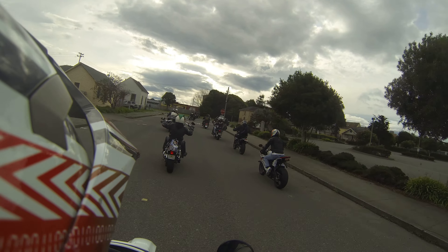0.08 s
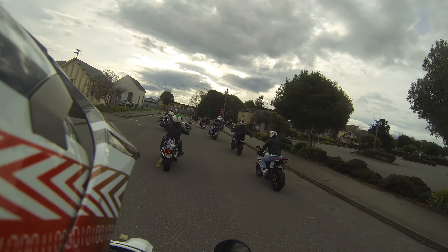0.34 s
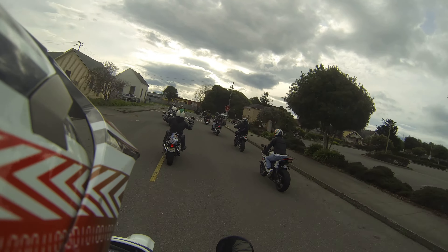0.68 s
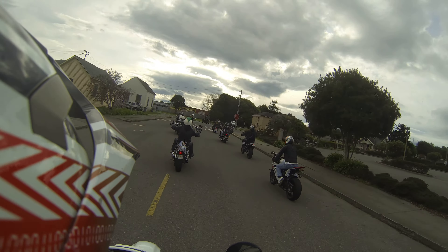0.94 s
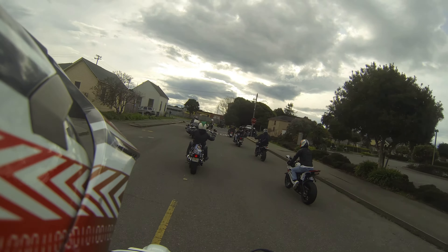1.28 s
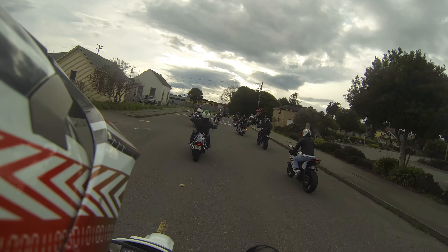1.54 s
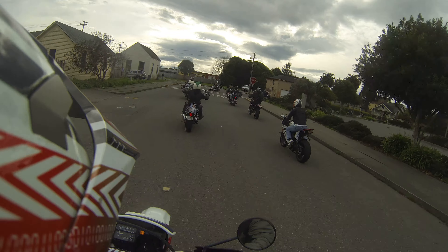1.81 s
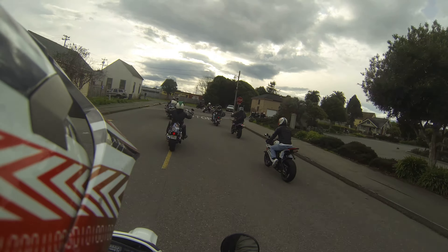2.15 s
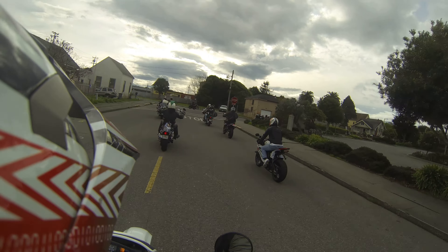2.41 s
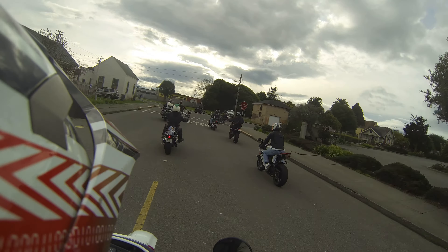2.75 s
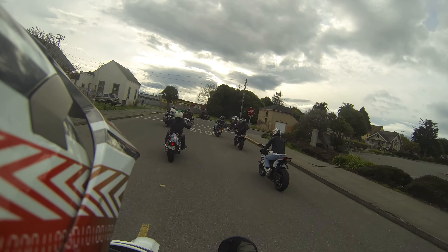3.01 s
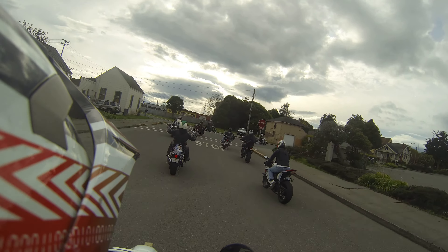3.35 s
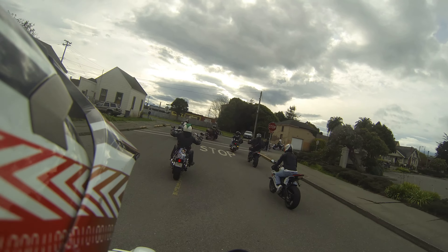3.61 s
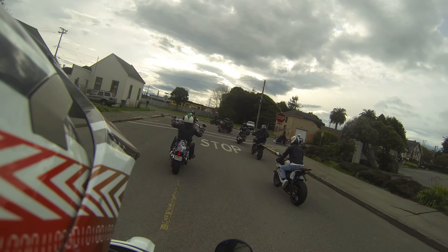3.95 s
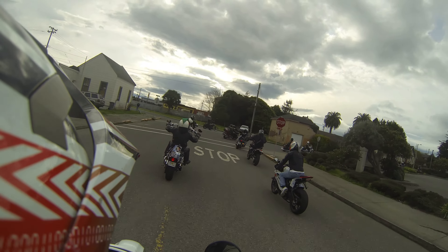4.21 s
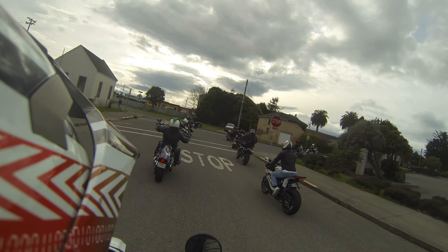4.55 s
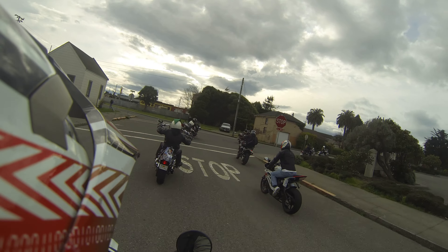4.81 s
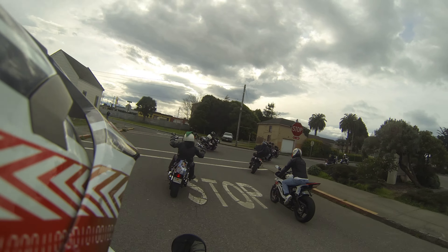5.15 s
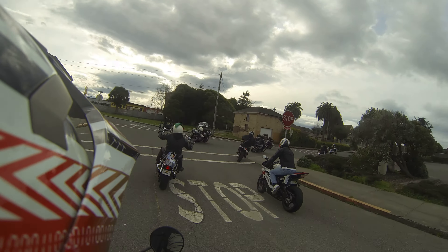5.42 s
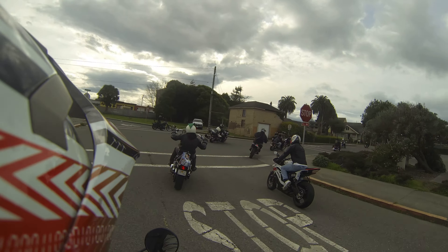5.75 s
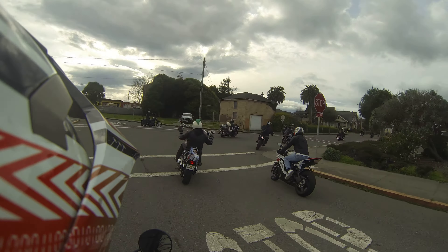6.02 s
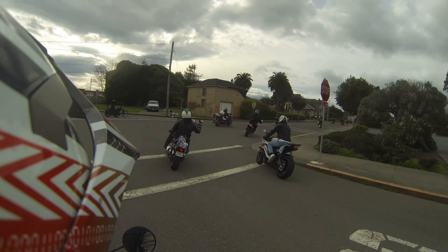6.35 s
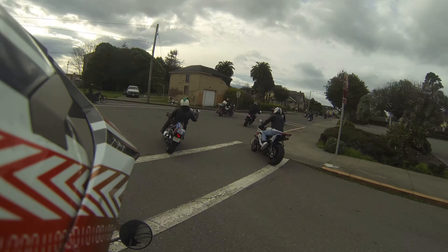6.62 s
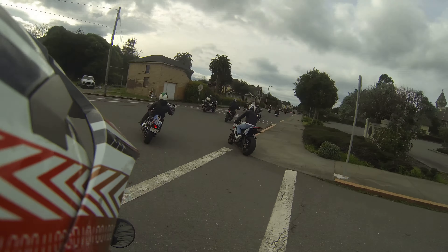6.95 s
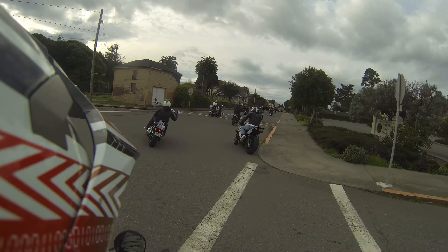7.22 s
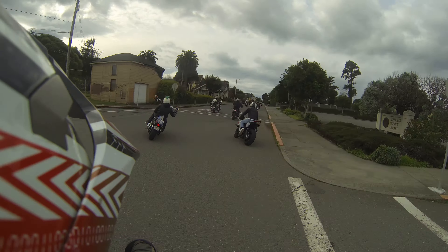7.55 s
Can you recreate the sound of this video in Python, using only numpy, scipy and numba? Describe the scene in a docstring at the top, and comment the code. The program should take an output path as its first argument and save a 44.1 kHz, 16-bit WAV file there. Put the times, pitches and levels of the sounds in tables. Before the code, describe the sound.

Heard from a rider's helmet in a group ride along a street, a single-cylinder motorcycle thumps, booms and rattles. A twin-cylinder bike just ahead barks with sharp, uneven cracks, another growls close by, and more drone further off, one giving a few brief revs. Low tyre and air rush and a faint chain hiss run underneath. Near the end the engines climb in pitch as the group pulls away through a junction.

```python
"""A single-cylinder motorcycle booms, thumps and clatters, heard from its rider's helmet in a group ride.
Its crank shakes the bike, each firing rings the exhaust pipe, and the piston and valves rattle the metal.
A V-twin just ahead barks and cracks in uneven pairs, a four-cylinder growls close by, the pack drones
further off and a sports bike revs briefly. Tyres and air rush and a chain hisses as the group rolls
along a street, then pulls away through a junction."""
import sys
import numpy as np
from scipy import signal
from scipy.fft import rfft, irfft
from scipy.io import wavfile
from numba import njit

SR = 44100
rng = np.random.default_rng(int(sys.argv[2]) if len(sys.argv) > 2 else 0)


def put_to_file(sound):
    """Save the sound as 16-bit audio at rate SR, in the file named by the first command-line argument."""
    columns = np.atleast_2d(sound).T  # one column per channel
    safe = np.clip(columns, -1, 1)
    whole_steps = np.round(safe * 32767)
    wavfile.write(sys.argv[1], SR, whole_steps.astype(np.int16))


N = 342657
T = np.arange(N) / SR  # the time of each sample, in seconds


def undb(db):
    """Turn decibels into a number to multiply a sound by."""
    return 10 ** (np.asarray(db) / 20)


def unit(x):
    """Scale a sound to an average (rms) level of 1."""
    return x / np.sqrt(np.mean(x ** 2))


def curves(table):
    """Join a table's timed rows with straight lines, giving one curve for each column after the time."""
    time_s, *columns = np.transpose(table)
    return [np.interp(T, time_s, column) for column in columns]


def noise():
    """White noise: an even hiss."""
    return rng.standard_normal(N)


def drift(rate_hz):
    """Wander at random, mostly between -1 and 1, reaching a new value rate_hz times a second."""
    return np.interp(T * rate_hz, np.arange(1024), rng.standard_normal(1024))


def colour(x, outline, size=8192):
    """Shape a sound's bass and treble to (pitch_hz, level_db) points, then scale it to level 1."""
    pitch_hz, level_db = np.transpose(outline)
    bins_hz = np.maximum(np.fft.rfftfreq(size, 1 / SR), 1)
    gain = undb(np.interp(np.log(bins_hz), np.log(pitch_hz), level_db))
    # these steps make the filter ring only after a hit, never before it
    cepstrum = irfft(np.log(gain))
    cepstrum[1:size // 2] *= 2
    cepstrum[size // 2 + 1:] = 0
    response = irfft(np.exp(rfft(cepstrum)))
    return unit(signal.fftconvolve(x, response)[:N])


def resonate(x, tones):
    """Ring (pitch_hz, width_hz, level_db) tones; any tone narrower than a 35th of its pitch is widened to that."""
    ringing = 0
    for pitch_hz, width_hz, level_db in tones:
        sharpness = min(pitch_hz / width_hz, 35)
        ringing += undb(level_db) * signal.lfilter(*signal.iirpeak(pitch_hz, sharpness, fs=SR), x)
    return unit(ringing)


@njit
def moving_band(x, pitch_hz, width_hz):
    """Let through only the sound near a pitch that can slide (a state-variable filter)."""
    out, band_state, low_state = np.empty(len(x)), 0., 0.
    for i in range(len(x)):
        tuning, damping = np.tan(np.pi * pitch_hz[i] / SR), width_hz / pitch_hz[i]
        band = (band_state + tuning * (x[i] - low_state)) / (1 + tuning * (tuning + damping))
        band_state = 2 * band - band_state
        low_state += 2 * tuning * band
        out[i] = damping * band
    return out


def strokes(cycles, at, scatter_db, jitter_s=0):
    """One click each time an engine is the fraction `at` through its cycle, each a little different."""
    turns = np.arange(-1, cycles[-1] + 1) + at
    turns = turns[(turns > cycles[0]) & (turns < cycles[-1])]
    timing, strength = rng.standard_normal((2048, 2))[:len(turns)].T
    time_s = np.interp(turns, cycles, T) + jitter_s * timing
    clicks = np.zeros(N)
    clicks[np.clip(time_s * SR, 0, N - 1).astype(int)] = undb(scatter_db * strength)
    return clicks


def burst(clicks, decay_s):
    """A short, fading puff of noise on each click."""
    return unit(noise() * signal.lfilter([1], [1, -np.exp(-1 / (decay_s * SR))], clicks))


def effort(throttle, revs, cruise_db, throttle_db, doubling_db):
    """A gain of cruise_db at half throttle and revs = 1 (cruising), growing with throttle and revs."""
    return undb(cruise_db + throttle_db * (throttle - .5) + doubling_db * np.log2(revs))


def pull_away(start_s=5.3, takes_s=2.4):
    """0 while the group rolls along, rising to about 1 as it leaves the junction."""
    return np.clip((T - start_s) / takes_s, 0, None)


def own_bike(cruise_hz=21):
    """The rider's own engine: its thump, boom and clatter all keep time with the crank."""
    # engine speed, where one cycle is two turns of the crank: time_s, cycle_hz
    speed = [(0.0, 18.204), (0.328, 17.287), (1.011, 17.873), (3.422, 21.536), (3.7, 21.2), (3.92, 20.2),
             (4.24, 20.15), (4.55, 19.6), (4.82, 20.15), (4.95, 19.9), (5.171, 20.071), (5.9, 21.7),
             (7.235, 25.304), (7.77, 28.131)]
    # the rider eases on, coasts, blips and pulls away: time_s, throttle (0 shut, 1 open)
    throttle_moves = [(0, 0.23), (.7, 0.55), (1.95, 0.77), (2.2, 0.63), (3.65, 0.61), (4.25, 0.52),
                      (4.8, 0.58), (4.95, 0.73), (5.1, 0.57), (5.5, 0.8), (6.25, 0.9), (6.75, 0.76),
                      (7.77, 0.86)]
    cycle_hz, = curves(speed)
    throttle, = curves(throttle_moves)
    revs = cycle_hz / cruise_hz
    cycles = np.cumsum(cycle_hz) / SR - .223
    exhaust = own_exhaust(cycles, throttle, revs)
    return exhaust + own_boom(cycles, cycle_hz) + own_clatter(cycles, throttle, revs)


def own_exhaust(cycles, throttle, revs):
    """One thump a cycle rings the pipe; hotter gas tunes it up, and an open throttle makes it bark."""
    # the pipe's low tones at cruising speed: pitch_hz, width_hz, level_db
    pipe_tones = [(85, 67, -15), (140, 35, -9), (186, 14, -9), (226, 24, 0), (246, 19, 3)]
    # the higher tones of its bark: pitch_hz, width_hz, level_db
    bark_tones = [(323, 35, 2.5), (379, 13, 7), (423.6, 58, 11.5), (558, 25, 7), (744, 140, 4.5)]
    firings = strokes(cycles, at=.02, scatter_db=1, jitter_s=.00005)
    thumps = colour(firings, [(30, -2.5), (100, 7.5), (300, 0), (600, -19.5), (1200, -19), (4000, -37)])
    heat = revs ** .2
    pipe = sum(undb(db) * moving_band(thumps, hz * heat, float(width)) for hz, width, db in pipe_tones)
    pipe = colour(pipe, [(280, -2.5), (600, -10.5), (2000, -34.5)])
    pipe *= effort(throttle, revs, cruise_db=-29, throttle_db=9, doubling_db=5)
    bark = resonate(thumps, bark_tones)
    bark *= effort(throttle, revs, cruise_db=-39.5, throttle_db=13, doubling_db=26)
    return pipe + bark


def own_boom(cycles, cycle_hz, resonance_hz=41.6):
    """The crank shakes the bike once a turn, lagging as it passes the rate the bike shakes at most easily."""
    # the boom swells when the engine pulls near that rate and drops off the throttle: time_s, level_db
    swells = [(0, -33.5), (1.3, -31), (1.6, -27), (2.05, -28), (2.15, -18.5), (2.8, -15), (3.25, -14),
              (3.35, -15), (3.5, -13.5), (3.7, -12.5), (4.0, -18), (4.4, -21), (4.8, -25.5), (4.95, -16),
              (5.08, -20.5), (5.4, -17), (5.75, -13.5), (6.3, -16), (6.55, -21.5), (7.1, -22.5),
              (7.77, -28)]
    # weaker shaking around the boom: shakes_per_cycle, level_db
    shake_tones = [(1, -21), (3, -3), (4, 5.5), (5, -6)]
    level_db, = curves(swells)
    lag_cycles = .449 + np.arctan((2 * cycle_hz - resonance_hz) / 5) / (2 * np.pi)
    angle = 2 * np.pi * (cycles - lag_cycles)
    boom = unit(np.cos(2 * angle)) * undb(level_db + .7 * drift(9.1))
    shake = unit(sum(undb(db) * np.cos(per_cycle * angle) for per_cycle, db in shake_tones))
    return boom + shake * undb(-31.5 + 1.4 * drift(10))


def own_clatter(cycles, throttle, revs):
    """The piston knocks once a cycle and the valves rattle; both ring the engine's metal cases."""
    # the hardest knocks, compared with each other: time_s, level_db
    hard_knocks = [(1.592, -21), (2.418, -21.5), (2.859, -25), (2.907, -22), (3.05, -22.5), (3.334, -21.5),
                   (4.152, -23), (4.251, -22), (4.704, -22), (5.4, -19), (6.996, -18), (7.647, -17.5)]
    # ringing of the cases and cooling fins: pitch_hz, width_hz, level_db
    case_tones = [(1056, 42, 5.5), (1340, 103, 10.5), (1494, 65, 12), (1540, 67, -24), (2155, 184, 1),
                  (3270, 44, -34), (3050, 83, -8), (4700, 99, -11)]
    piston = burst(strokes(cycles, at=.25, scatter_db=2.5, jitter_s=.0008), decay_s=.0025)
    valves = burst(strokes(7 * cycles, at=.25, scatter_db=0, jitter_s=.0015), decay_s=.0033)
    blows = undb(-6) * piston + undb(-7) * valves + undb(-7) * noise()
    blows *= effort(throttle, revs, cruise_db=-34.8, throttle_db=.3, doubling_db=5.5)
    knocks = np.zeros(N)
    for time_s, level_db in hard_knocks:
        knocks[int(time_s * SR)] = undb(level_db)
    blows += unit(knocks) * undb(-48.5)
    outline = [(300, -24.5), (800, -6), (1200, 6.5), (1700, -2.5), (2100, -5), (5000, -15),
               (9000, -21), (15000, -44)]
    return colour(resonate(blows, case_tones), outline) * np.std(blows)


def v_twin(cruise_hz=13):
    """Two cylinders fire at uneven gaps; with the throttle open, each pulse of gas carries a sharp crack."""
    # engine speed: time_s, cycle_hz
    speed = [(0.0, 12.104), (1.175, 13.185), (1.684, 13.83), (2.941, 11.651), (3.51, 11.177),
             (4.078, 11.213), (5.194, 12.379), (5.806, 13.704), (6.83, 18.179), (7.77, 20.38)]
    # it drives, shuts off, opens up for the junction and eases off: time_s, throttle (0 shut, 1 open)
    throttle_moves = [(0, 0.86), (.3, 0.68), (.6, 0.79), (1.65, 0.51), (1.95, 0.07), (2.9, .02),
                      (3.03, 0.25), (3.5, 0.56), (4.6, 0.51), (5.8, 0.92), (6.1, 0.77), (6.55, 0.82),
                      (7.12, 0.65), (7.3, 0.23), (7.77, 0.36)]
    cycle_hz, = curves(speed)
    throttle, = curves(throttle_moves)
    revs = cycle_hz / cruise_hz
    cycles = np.cumsum(cycle_hz) / SR - .401
    first = strokes(cycles, at=0, scatter_db=1.2)
    second = strokes(cycles, at=.432, scatter_db=1.2)
    exhaust = twin_exhaust(first + second, cycle_hz, throttle, revs)
    crack_sizes = first + second * undb(-8.5)  # the second cylinder cracks more softly
    crack_sizes *= effort(throttle, revs, cruise_db=-34.5, throttle_db=28, doubling_db=.5)
    crack_sizes *= undb(3.5 * drift(25))  # no two cracks are alike
    return exhaust + twin_cracks(crack_sizes, cycle_hz)


def twin_exhaust(firings, cycle_hz, throttle, revs):
    """Pulses of gas thud out of the V-twin's pipes, which add a hollow bark at high revs."""
    # the tone of one thud: pitch_hz, level_db
    thud_outline = [(20, -26.5), (33, 5.5), (48, 11.5), (68, 7.5), (90, 9.5), (115, 2), (160, 3.5),
                    (220, 0), (290, -6), (400, -10), (560, -15.5), (750, -25), (1300, -15), (1700, -14),
                    (2200, -50), (5000, -59.5)]
    # the pipes' hollow ringing: pitch_hz, width_hz, level_db
    bark_tones = [(247, 25, 3.5), (303.5, 9.7, 2), (403, 10, -7), (540, 38, -8.5)]
    pulses = colour(firings, thud_outline)
    # each pulse runs back up the pipe and leaves it again, sooner as the gas gets hotter
    round_trip_s = np.interp(cycle_hz, [12, 20], [.0145, .0115])
    returned = np.interp(T - round_trip_s, T, pulses, left=0)
    thuds = unit(pulses + .21 * returned)
    thuds *= effort(throttle, revs, cruise_db=-32.5, throttle_db=17.5, doubling_db=7)
    bark = resonate(firings, bark_tones)
    bark = colour(bark, [(90, -20), (200, 4.5), (500, 0), (800, -14.5), (3000, -32)])
    bark *= effort(throttle, revs, cruise_db=-46, throttle_db=3, doubling_db=24)
    return thuds + bark


def twin_cracks(sizes, cycle_hz):
    """Each sudden jump in pressure snaps and rings the pipe ends; a puff of gas rasps with it."""
    # the loudest cracks: start_s, level_db, favoured_hz (the ring is boosted near this pitch)
    loud_cracks = [(0.0323, -27.5, 2840), (0.069, -25.5, 5040), (0.1156, -27, 5600), (0.5186, -28, 2840),
                   (0.598, -31.5, 3000), (0.6764, -29, 2830), (0.7552, -26, 2970), (1.1397, -28, 5120),
                   (1.2156, -27, 5080), (1.291, -30, 2930), (1.3643, -33, 5040), (1.6605, -27.5, 5500),
                   (3.0355, -34, 4820), (3.083, -32, 6500), (3.434, -33, 5700), (3.6142, -31.5, 6500),
                   (3.6531, -34, 5040), (4.0986, -31, 5040), (4.2373, -32, 2880), (4.2763, -28.5, 5000),
                   (4.4496, -29.5, 5000), (4.5835, -33, 5000), (4.6668, -31, 2840), (4.7532, -31, 6460),
                   (4.787, -32, 5000), (4.8356, -26, 5560), (4.9537, -32, 5000), (5.0001, -31, 3060),
                   (5.0819, -29.5, 3010), (5.1642, -31, 5000), (5.1986, -31, 4950), (5.243, -28.5, 2840),
                   (5.3238, -29, 5430), (5.4032, -26.5, 6540), (5.4356, -31, 5040), (5.4799, -26.5, 6540),
                   (5.513, -27.5, 5000), (5.5568, -28.5, 6500), (5.6321, -32, 3060), (5.7076, -30.5, 5080),
                   (5.7394, -29.5, 5000), (5.7805, -30, 5600), (5.8107, -29, 7540), (5.8516, -31, 2930),
                   (5.924, -27.5, 3750), (5.9947, -27, 6590), (6.0238, -27, 5040), (6.062, -24, 5510),
                   (6.092, -25, 5000), (6.13, -23.5, 3770), (6.1569, -25.5, 3850), (6.1937, -24, 6500),
                   (6.2225, -27, 5080), (6.2596, -25, 7660), (6.322, -26, 3010), (6.3485, -33, 5030),
                   (6.384, -31, 2940), (6.4442, -28, 5120), (6.5044, -25.5, 5040), (6.564, -24.5, 4820),
                   (6.6224, -28, 5080), (6.6782, -27.5, 5000), (6.7366, -31, 3060), (6.7925, -30.5, 3060),
                   (6.847, -31, 5000), (6.902, -33, 5000), (6.9584, -32, 3060), (7.012, -31, 3140),
                   (7.0643, -30, 5000), (7.1172, -31.5, 3100), (7.1703, -36, 5000), (7.2216, -36, 6500),
                   (7.3264, -36, 5500), (7.4297, -36, 4980), (7.5818, -37, 4840), (7.6312, -35, 5000)]
    # the tone of the rasping gas: pitch_hz, level_db
    rasp_outline = [(600, -42), (1600, 18.5), (2200, 16), (2600, -32), (3300, 15), (3900, 9), (4300, 6),
                    (5100, 11.5), (6000, -0.5), (6500, -6), (7700, -6), (8800, -28), (13500, -19),
                    (15500, -26)]
    shots = [(start_s, undb(db), favoured_hz) for start_s, db, favoured_hz in loud_cracks]
    loud_times_s = np.transpose(loud_cracks)[0]
    for i in np.flatnonzero(sizes):
        if min(abs(loud_times_s - T[i])) > .012:  # the remaining firings crack softly
            shots.append((T[i], min(sizes[i], undb(-32.5)), rng.uniform(2500, 7000)))
    shocks, ring = np.zeros(N), np.zeros(N)
    for start_s, size, favoured_hz in shots:
        start = int(start_s * SR)
        shocks[start] += size
        ping = pipe_ring(favoured_hz)[:N - start]
        ring[start:start + len(ping)] += size * ping
    snap_outline = [(1000, -14), (5400, 1), (6000, -8), (6400, 1), (7600, 1), (9000, -8),
                    (11000, -11), (13000, -4), (14100, -4.5), (15000, -18)]
    snap = colour(burst(shocks, decay_s=.0025), snap_outline) * undb(-1)
    rasp_db = np.interp(cycle_hz, [12.5, 15], [8, 14])  # more rasp as the revs climb
    rasp = colour(burst(shocks, decay_s=.0015), rasp_outline) * undb(rasp_db)
    cracks = ring * undb(.5) + (snap + rasp) * np.std(shocks)
    # each crack also bounces off the road
    echo_delay_s = .0022 * np.exp(.208 * drift(3))
    echo = np.interp(T - echo_delay_s, T, cracks, left=0)
    return cracks + undb(-10) * echo


def pipe_ring(favoured_hz):
    """One ping of the V-twin's pipe ends: every crack strikes a new mix of tones, slightly out of tune."""
    # ringing of the open pipe ends: pitch_hz, width_hz (wider fades faster), level_db
    end_tones = [(1590, 130, -.5), (2850, 55, -13), (3070, 55, -13.5), (3770, 90, -17), (5010, 90, -12.5),
                 (5540, 105, -16.5), (6480, 115, -15), (7550, 130, -21.5), (9400, 160, -30)]
    pitch_hz, width_hz, level_db = np.transpose(end_tones)
    strength, detune = rng.standard_normal((2, len(pitch_hz)))
    nearness = np.exp(-(np.log(pitch_hz / favoured_hz) / .13) ** 2)
    age_s = T[:2048, None]
    tones = np.sin(2 * np.pi * pitch_hz * (1 + .022 * detune) * age_s)
    fade = np.exp(-np.pi * width_hz * age_s)
    return (tones * fade) @ undb(level_db + 5 * nearness + 3 * strength)


def four_cylinder():
    """A bike close by growls on a light throttle, firing unevenly, and opens up out of the corner."""
    # how fast and how loudly it runs: time_s, firing_hz, level_db
    run = [(0, 150, -36), (.5, 152, -43), (1.8, 156, -41), (2.4, 135, -38), (3.5, 148, -43),
           (4.4, 138, -37), (4.65, 146, -33), (5, 143, -38), (5.4, 140, -35), (5.9, 148, -30.5),
           (6.3, 160, -35), (6.9, 196, -40), (7.4, 205, -39), (7.62, 218, -31), (7.77, 228, -28)]
    # the tone of its exhaust: pitch_hz, level_db
    pipe_outline = [(30, -40), (90, -14), (130, 0), (250, 0), (330, -15), (600, -26), (1500, -45),
                    (5000, -75)]
    firing_hz, level_db = curves(run)
    cycles = np.cumsum(firing_hz * (1 + .025 * drift(25))) / SR
    firings = strokes(cycles, at=0, scatter_db=3, jitter_s=.0004)
    return colour(firings - firings.mean(), pipe_outline) * undb(level_db)


def pack():
    """Bikes further up the road drone, each wandering at its own speed; all speed up at the junction."""
    # one row a bike: firing_hz, level_db, speed_rise (0.5 = half as fast again after pulling away)
    bikes = [(24.47, -5, 0.5), (33.16, -1.5, .3), (45.05, -2.5, 0.4), (74.34, -4, 0.5)]
    # the tone of their distant exhausts: pitch_hz, level_db
    pipe_outline = [(20, -28), (45, -3), (68, 4.5), (100, 0.5), (140, -3.5), (230, -4.5), (320, -19),
                    (450, -17.5), (700, -29.5), (1500, -58), (5000, -82.5)]
    firings = 0
    for firing_hz, level_db, speed_rise in bikes:
        cycles = np.cumsum(firing_hz * (1 + .035 * drift(1.3) + speed_rise * pull_away())) / SR
        clicks = strokes(cycles, at=rng.random(), scatter_db=1.5, jitter_s=.00049)
        firings += undb(level_db) * unit(clicks)
    # echoes from the road and house fronts smear the pulses
    echo_tail = unit(noise()[:SR // 4]) * np.exp(-T[:SR // 4] / .12)
    echoes = signal.fftconvolve(firings, echo_tail)[:N]
    drone = unit(firings - firings.mean()) + .57 * unit(echoes)
    return colour(drone, pipe_outline) * undb(-27.5)


def road_rush():
    """Tyres and air make a low rush that grows as the group speeds up."""
    # the tone of the rush: pitch_hz, level_db
    rush_outline = [(10, -47), (25, -5.5), (70, 2.5), (200, -2), (350, -5.5), (520, -12), (750, -20),
                    (1050, -18), (1700, -16), (2500, -42.5), (5000, -73)]
    return colour(noise(), rush_outline) * undb(-31.5 + 5 * pull_away() + .5 * drift(7.3))


def chain_hiss():
    """The chain and its toothed wheels ring with a flickering hiss."""
    # ringing of the chain and wheels: pitch_hz, width_hz, level_db
    chain_tones = [(2474, 280, 6), (2995, 350, 4.5), (3333, 48, 6), (4050, 700, -1.5), (4980, 490, 5),
                   (5400, 150, -15), (6250, 570, -2.5), (7250, 260, -1), (8400, 250, -9.5),
                   (9800, 750, -12), (12500, 550, -19)]
    # the overall tone of the hiss: pitch_hz, level_db
    hiss_outline = [(800, 1.5), (2000, 4), (7500, -6.5), (9000, -9), (15000, -7)]
    hiss = colour(resonate(noise(), chain_tones), hiss_outline)
    return hiss * undb(-49 + 1.8 * drift(120))


def sports_bike(fade_in_s=.04, fade_out_s=.06):
    """Two neighbouring tones of a four-cylinder engine ahead climb and flutter on each short rev."""
    # one row a rev: start_s, length_s, pitch_hz, rise_hz_per_s, level_db
    short_revs = [(2.0, .11, 436, 72, -38), (2.25, .3, 402, 72, -45), (2.54, .38, 421, 72, -37),
                  (6.08, .3, 425, 90, -35), (6.55, .45, 474, 40, -37), (7.62, .2, 522, 72, -42)]
    out = 0
    for start_s, length_s, pitch_hz, rise_hz_per_s, level_db in short_revs:
        age_s = np.clip(T - start_s, 0, length_s)
        fade = np.minimum(1, np.minimum(age_s / fade_in_s, (length_s - age_s) / fade_out_s))
        note_hz = (pitch_hz + rise_hz_per_s * age_s) * (1 + .004 * drift(60))
        phase = 2 * np.pi * np.cumsum(note_hz) / SR
        note = np.sin(phase) + undb(-8) * np.sin(phase * 6 / 5)
        out += unit(note) * fade * undb(level_db)
    return out * undb(.31 * drift(30))


def scene():
    """Everything as it reaches the helmet, in one channel."""
    engines = own_bike() + v_twin() + four_cylinder() + pack() + sports_bike()
    return (engines + road_rush() + chain_hiss())[None]


def record(dry):
    """Cut away the highest treble."""
    top_hz = 15400
    return signal.sosfilt(signal.ellip(8, .2, 70, top_hz, fs=SR, output="sos"), dry)


dry = scene()
out = record(dry)
put_to_file(out)
```